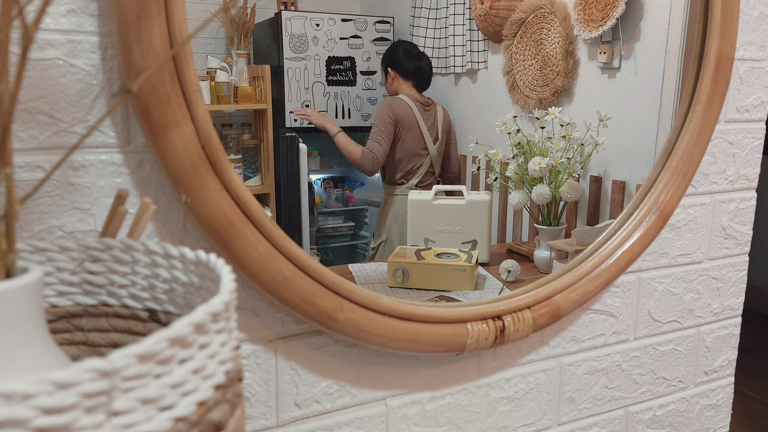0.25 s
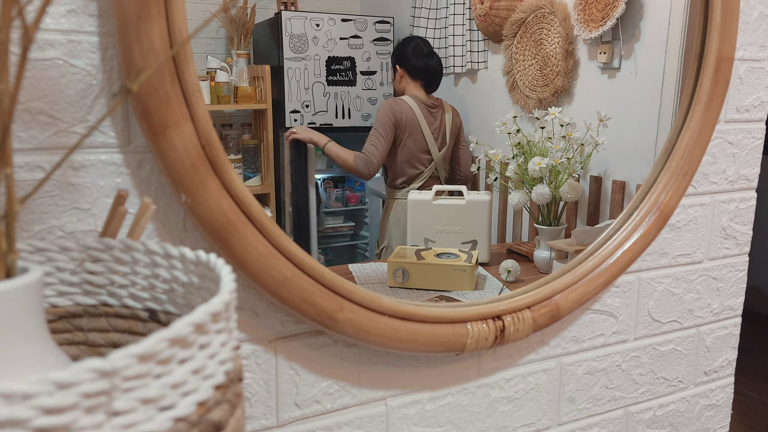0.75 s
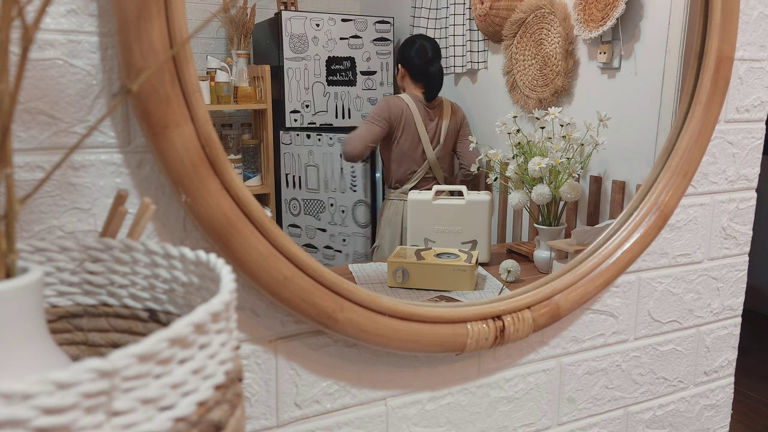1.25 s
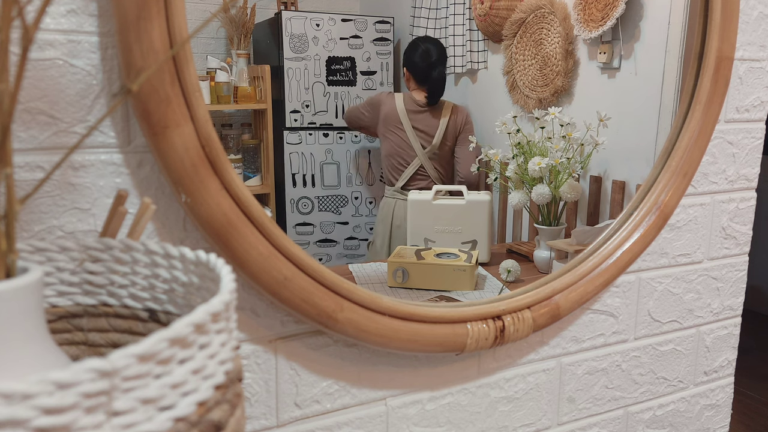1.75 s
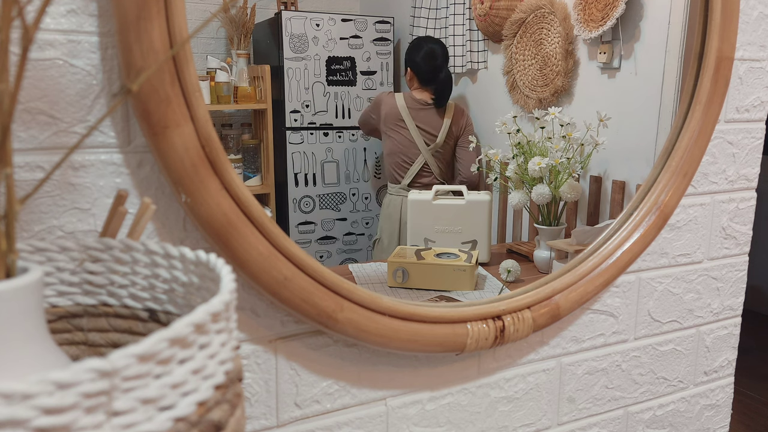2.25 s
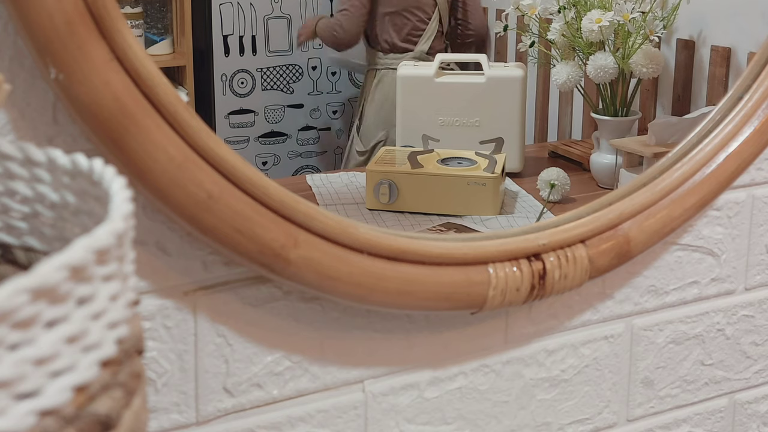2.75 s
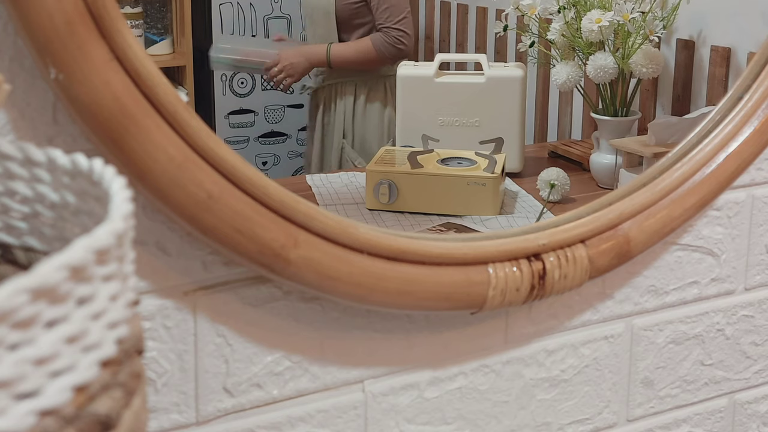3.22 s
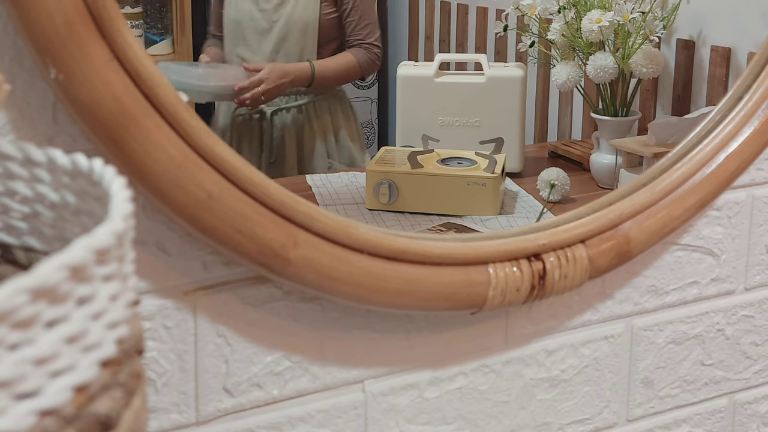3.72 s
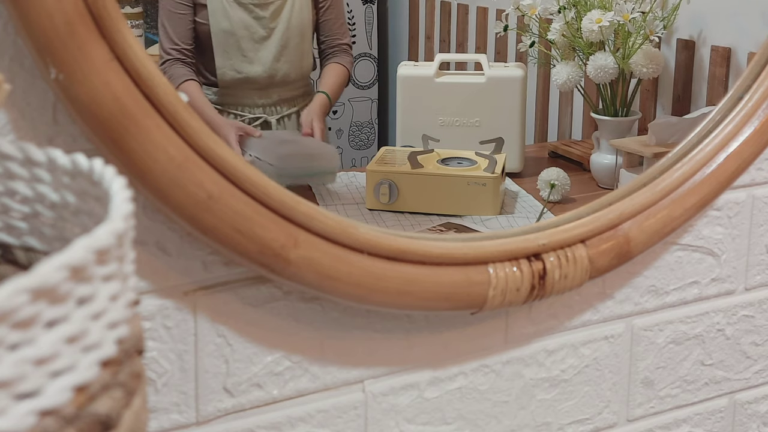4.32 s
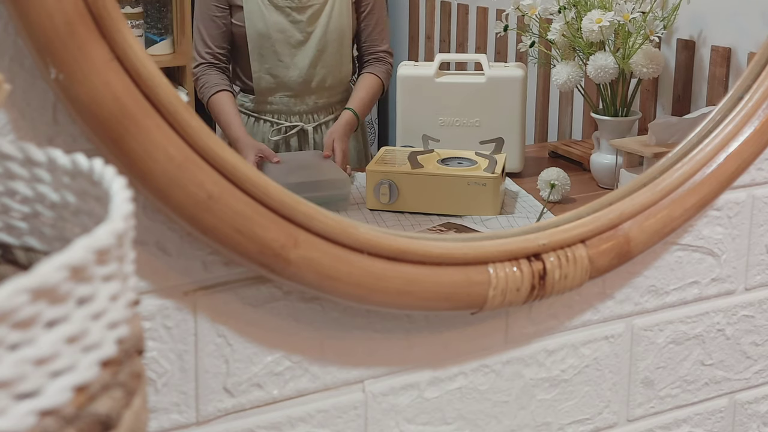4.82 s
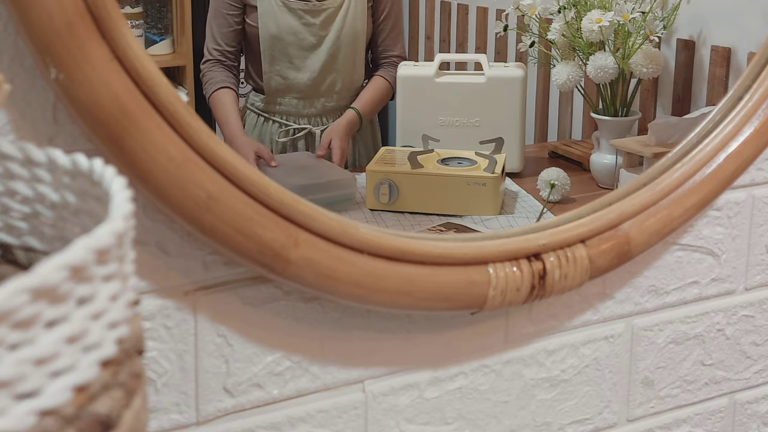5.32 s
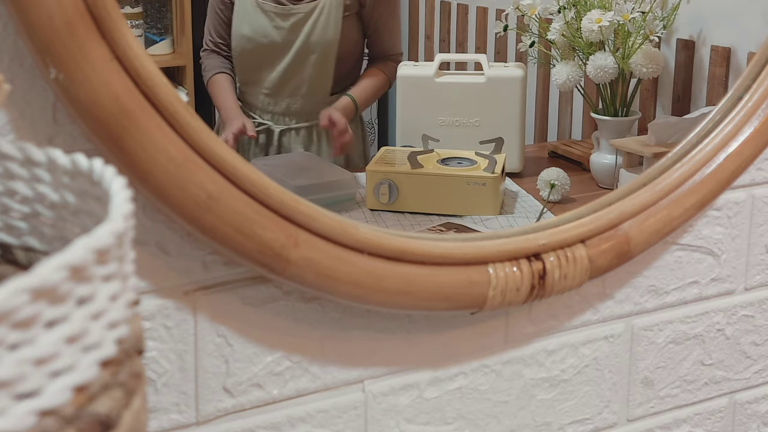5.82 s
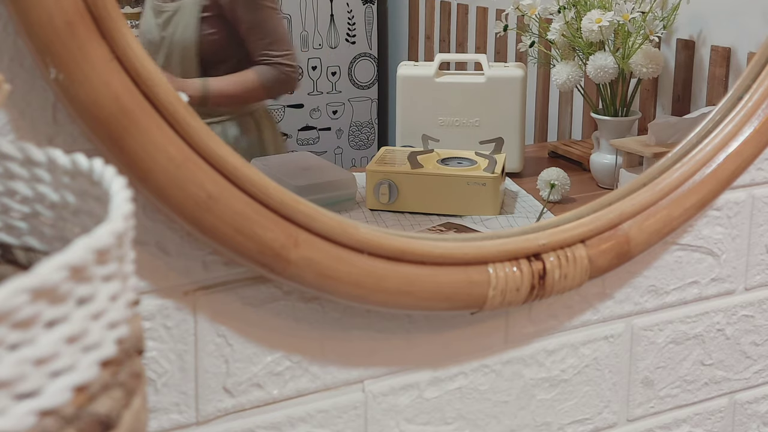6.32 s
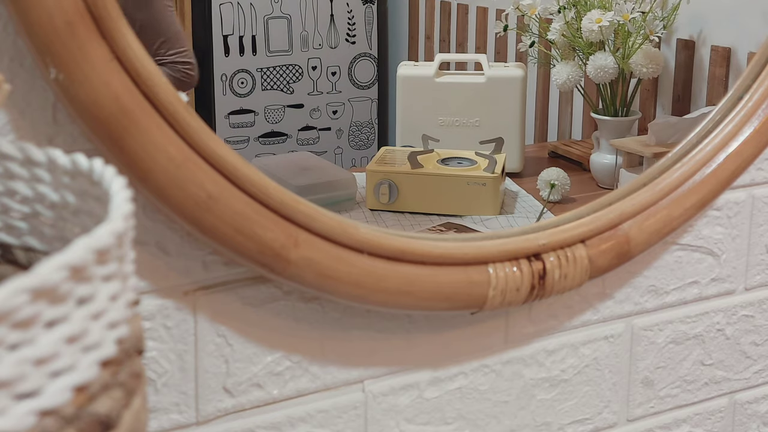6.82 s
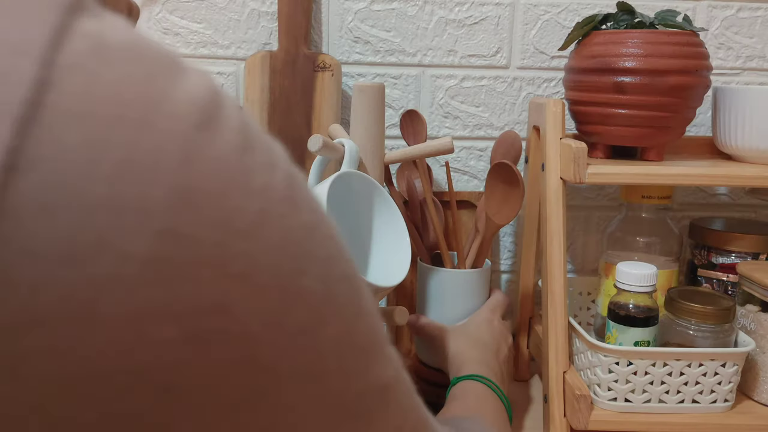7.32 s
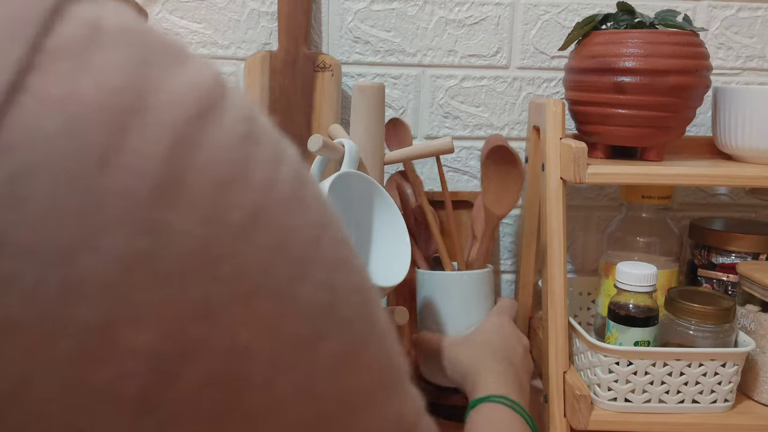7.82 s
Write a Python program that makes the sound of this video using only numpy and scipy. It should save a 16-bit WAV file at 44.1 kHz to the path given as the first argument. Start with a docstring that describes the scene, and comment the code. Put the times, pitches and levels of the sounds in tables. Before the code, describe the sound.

Over soft fridge hum and a ticking clock, a door closes heavily, a box lands and its latches snap, and a ceramic cup scrapes with spoons knocking.

```python
"""Quiet kitchen with fridge, box and spoons

A hard-walled kitchen at two microphone ports. Something slides and bumps in the fridge; its door is nudged
and thuds shut. A plastic box is set on a table, its latches snap, and a cup of spoons is dragged and clatters.
Blows are decaying modes plus a noise burst; slides are noisy slips through resonances. A wall clock steps
once a second until 6.6 s over fridge hum and air; clothes rustle. The level dips briefly at 7.1 s."""
import sys
import numpy as np
from scipy import signal
from scipy.fft import rfft, irfft
from scipy.io import wavfile
from scipy.ndimage import uniform_filter1d

SR = 44100
rng = np.random.default_rng(int(sys.argv[2]) if len(sys.argv) > 2 else 0)


def to_wav(s):
    """Save 16-bit WAV."""
    ch = np.atleast_2d(s).T  # columns
    pcm = np.round(np.clip(ch, -1, 1) * 32767)  # PCM
    wavfile.write(sys.argv[1], SR, pcm.astype(np.int16))


N = 355887
TIME = np.arange(N) / SR
DIP_S, DIP_LENGTH_S = 7.1025, 0.003   # the level dips briefly here


def from_db(db):
    """Decibels to gain."""
    return 10 ** (np.asarray(db) / 20)


def rms_one(x):
    """Scale to rms 1."""
    return x / np.sqrt(np.mean(x ** 2) + 1e-20)


def at_hz(points, hz):
    """Read a table on a log-frequency axis."""
    table_hz, value = np.array(points).T
    return np.interp(np.log(hz + 1), np.log(table_hz), value)


def level(rows):
    """Gain curve over time from (time_s, level_db) rows."""
    return from_db(np.interp(TIME, *np.transpose(rows)))


def coloured(x, spectrum):
    """Give x the spectrum; rms 1."""
    size = x.shape[-1]
    hz = np.arange(size // 2 + 1) * SR / size
    return rms_one(irfft(rfft(x) * from_db(at_hz(spectrum, hz)), size))


# How alike the two microphone ports hear diffuse sound: pitch_hz, likeness (1 = identical)
PORT_LIKENESS = [(40, 0.74), (120, 0.62), (400, 0.77), (1000, -0.13), (3000, -0.046), (15000, -0.041)]


def wide(size, source=1):
    """Noise at the two microphone ports: alike in the bass, unrelated in the treble."""
    shared, own = rfft(rng.standard_normal((2, size)) * source)
    hz = np.arange(size // 2 + 1) * SR / size
    alike = np.clip(at_hz(PORT_LIKENESS, hz), -1, 1)
    middle = np.sqrt((1 + alike) / 2) * shared
    side = np.sqrt((1 - alike) / 2) * own
    return irfft([middle + side, middle - side], size)


def resonate(x, hz, width_hz):
    """One resonance with gain 1 on top."""
    r = np.exp(-np.pi * width_hz / SR)
    top = (1 - r * r) / 2
    return signal.lfilter([top, 0, -top], [1, -2 * r * np.cos(2 * np.pi * hz / SR), r * r], x)


def narrow(x, hz, width_hz):
    """A resonance applied twice, with steep sides."""
    return resonate(resonate(x, hz, width_hz), hz, width_hz)


def body(slips, peaks):
    """Slips heard through a few resonances; rms 1."""
    return rms_one(sum(from_db(db) * narrow(slips, hz, width) for hz, width, db in peaks))


def grit(per_s, spread_db):
    """Envelope of dense slips at random moments and of uneven strength."""
    slipping = rng.random(N) < per_s / SR
    return slipping * from_db(spread_db * np.minimum(rng.exponential(1, N), 4))


def stroke(s, db, attack_s, hold_s, release_s):
    """Gain that rises 30 dB per attack_s, holds, then falls 30 dB per release_s, reaching 180 dB down on either
    side."""
    rise = (s + attack_s - TIME) / attack_s
    fall = (TIME - s - attack_s - hold_s) / release_s
    return from_db(db - 30 * np.clip(np.maximum(rise, fall), 0, 6))


# Tilt of diffuse sound across the ports: pitch_hz, left_minus_right_db
PORT_BALANCE = [(60, 9.5), (240, 1.5), (950, 1.5), (3770, 0.5), (15000, -4)]


def leaning(x):
    """Diffuse sound reaches the left port with more bass, the right with more treble."""
    lean = at_hz(PORT_BALANCE, np.arange(N // 2 + 1) * SR / N) / 2
    return irfft(rfft(x) * from_db([lean, -lean]), N)


def add(out, sound, s, pan_db):
    """Lay a sound into the stereo track; pan_db is left minus right."""
    at = round(s * SR)
    sound = sound[:N - at]
    out[:, at:at + len(sound)] += sound * from_db([[pan_db / 2], [-pan_db / 2]])


def crack(spectrum, t60, rise_s):
    """The burst of countless short modes at a contact: so many overlap that its spectrum has no gaps."""
    t = np.arange(4096) / SR
    fall = from_db(-30 * t / t60)
    noise = rfft(rng.standard_normal(len(t)) * fall)
    even = irfft(np.exp(1j * np.angle(noise)))   # keep only the phase: a flat spectrum
    burst = coloured(even, spectrum) * fall * (1 - np.exp(-t / rise_s))
    return burst * np.sqrt(np.sum(fall ** 4) / np.sum(burst ** 2))


def blows(events, modes, spectrum, crack_t60, rise_s, pan_db, order=1):
    """Each blow rings the same modes, neighbours in opposite phase; a softer contact dulls the high ones."""
    out, t = np.zeros((2, N)), np.arange(SR // 3) / SR
    hz, mode_db, t60 = np.array(modes).T[:, :, None]
    phase = (-1) ** np.arange(len(hz))[:, None]
    for s, db, contact_hz, ring_db in events:
        uneven_db = 1.5 * rng.standard_normal(hz.shape)   # no two blows strike quite alike
        strength = from_db(ring_db + mode_db + uneven_db) * phase
        ringing = strength * from_db(-60 * t / t60) * np.sin(2 * np.pi * hz * t)
        sound = ringing.sum(axis=0) * (1 - np.exp(-t / rise_s))
        sound[:4096] += crack(spectrum, crack_t60, rise_s)
        soft = signal.butter(order, min(contact_hz, SR / 2.2), fs=SR)
        add(out, from_db(db) * signal.lfilter(*soft, sound), s, pan_db)
    return out


# Colour of a thing sliding on a fridge shelf: pitch_hz, density_db (relative)
SHELF_SLIDE_COLOUR = [(900, -13.5), (1850, -12), (2250, -2), (2850, -11.5), (4000, -5.5), (5600, -13.5),
                      (9100, -20), (13400, -12.5), (15800, -20)]


def fridge_slide():
    """Slips under a thing on a fridge shelf, already under way at the start."""
    gain = stroke(-.01, db=-48.5, attack_s=0.0095, hold_s=0.13, release_s=0.26)
    return gain * coloured(wide(N, grit(9000, 0.5)), SHELF_SLIDE_COLOUR)


# Steady air of the room (fridge motor and fan, far street, microphone hiss): pitch_hz, density_db (relative)
ROOM_AIR = [(12, -63), (20, -38), (55, 2), (110, 3), (168, -6.5), (248, -6), (399, -4), (472, -13.5),
            (513, -32), (718, -56), (1330, -36.5), (16000, -39)]


def air():
    """Broad steady noise of the room and the microphone."""
    return from_db(-53.5) * coloured(wide(N), ROOM_AIR)


# Fridge motor tones: pitch_hz, width_hz, level_db (rms, before the tilt across the ports)
FRIDGE_HUM = [(124.6, 27, -65), (246, 12.4, -57), (325.7, 19, -63), (516.6, 11, -68)]


def fridge_hum():
    """Wavering motor tones: noise through narrow resonances."""
    white = wide(N)
    return sum(from_db(db) * rms_one(narrow(white, hz, width)) for hz, width, db in FRIDGE_HUM)


# Faint rushing in the middle range, over time: time_s, level_db
RUSHING_LEVEL = [(0., -66), (1.75, -61), (2.1, -45.5), (2.7, -63), (7.09, -59), (7.12, -62.5),
                 (8.07, -53.5)]
# Its colour: pitch_hz, density_db (relative)
RUSHING_COLOUR = [(300, -3), (500, 5), (1000, -6), (1500, -12.5), (3000, -24.5), (6000, -59)]


def rushing():
    """Middle-range noise whose level rises and falls."""
    return level(RUSHING_LEVEL) * coloured(wide(N), RUSHING_COLOUR)


# Two runs of clock steps one second apart: start_s, count
CLOCK_RUNS = [(.527, 3), (3.533, 4)]
# Sound of the clock case at each contact: pitch_hz, density_db (relative)
CASE_CRACK = [(600, -29), (900, -2), (1400, -3), (2100, -0.5), (2800, -14.5), (3500, -4.5), (6200, -11),
              (7200, -17), (13000, -24)]
# A small ringing part, loudest on the first contacts: pitch_hz, level_db, t60_s, loss_db_per_s
CLOCK_PART = (6200, 3.6, 0.013, 300)


def clock():
    """Each step of the seconds hand is the same run of six gear contacts that swells to a peak and fades."""
    gap_s, peak_s, peak_db = 0.018, 0.06, -46
    swell_db_per_s, fade_db_per_s = 341, 246
    out, t = np.zeros((2, N)), np.arange(4096) / SR
    hz, ring_db, t60, loss = CLOCK_PART
    ring = from_db(ring_db - 60 * t / t60) * np.sin(2 * np.pi * hz * t)
    for s in [first + k for first, count in CLOCK_RUNS for k in range(count)]:
        for after in gap_s * np.arange(6):
            db = peak_db - max(swell_db_per_s * (peak_s - after), fade_db_per_s * (after - peak_s))
            contact = crack(CASE_CRACK, 0.041, 0.00076) + from_db(-loss * after) * ring
            add(out, from_db(db) * contact, s + after, 1.5)
    return out


# Dull bumps of hands and things: start_s, level_db, pitch_hz, scuff_db (relative)
DULL_BUMPS = [(0.732, -17, 299, -16), (.774, -20.5, 282, -21), (1.797, -28.5, 478, -15.5),
              (1.881, -40, 251, 5), (1.986, -29.5, 424, -7.5), (2.094, -34.5, 308, -9.5),
              (2.136, -22, 383, -21.5), (3.515, -36, 393, -35), (4.032, -28.5, 448, -22),
              (4.602, -25, 388, -33), (4.878, -25, 116, -45), (5.643, -35.5, 305, -4.5)]
# Colour of the scuff, also of the door rattle: pitch_hz, density_db (relative)
SCUFF_COLOUR = [(400, -10), (1200, -14), (2500, -19), (6000, -34), (15000, -44.5)]


def bumps():
    """A soft push rings a close pair of panel modes, with a scuff on top."""
    out, t = np.zeros((2, N)), np.arange(4096) / SR
    for s, db, hz, scuff_db in DULL_BUMPS:
        pair = np.sin(2 * np.pi * hz * t) + 0.24 * np.sin(2 * np.pi * 1.36 * hz * t)
        thud = pair * from_db(-60 * t * hz / 14)   # falls 60 dB in 14 cycles
        thud = thud * (1 - np.exp(-t / 0.0013))
        scuff = from_db(scuff_db - 7.5) * crack(SCUFF_COLOUR, 0.057, 0.034)
        add(out, from_db(db) * (thud + scuff), s, 0.5)
    return out


# Things rattle in the swinging door: start_s, level_db, attack_s, hold_s
DOOR_RATTLE = (1.73, -60.5, 0.3865, 0.28)


def door_rattle():
    """Sparse, very uneven knocks of things in the swinging door."""
    s, db, attack, hold = DOOR_RATTLE
    return stroke(s, db, attack, hold, attack) * coloured(wide(N, grit(380, 7.5)), SCUFF_COLOUR)


# The fridge cabinet rocks when nudged and after the thud: start_s, level_db, hold_s
CABINET_ROCKS = [(1.976, -39.5, 0.067), (2.111, -34, .01), (2.385, -38, 0.061)]


def rocking():
    """The cabinet sways on its lowest mode with a loose rattle an octave up."""
    sway = sum(stroke(s, db, 0.036, hold, 0.19) for s, db, hold in CABINET_ROCKS)
    tone = np.sin(2 * np.pi * 72.3 * TIME)
    loose = rms_one(narrow(wide(N), 145, 47))
    return sway * np.sqrt(2) * (tone + 0.3 * loose)


# Fridge door on its seal: start_s, level_db, contact_hz, ringing_db (relative)
DOOR_BLOWS = [(2.218, -23, 5930, -27), (2.229, -8.5, 2540, 4.5)]
# Ringing of door and cabinet: pitch_hz, level_db (relative), t60_s
FRIDGE_MODES = [(41.4, -10.5, 0.64), (67.7, -0.5, 0.3), (126.9, -15, 0.62), (400, -5.5, 0.058),
                (510, -8.5, 0.047)]
# Burst at the seal: pitch_hz, density_db (relative)
SEAL_CRACK = [(180, 1), (400, -8), (1000, -8.5), (1600, -17), (2200, -12), (3000, -22), (15500, -23)]


def fridge_door():
    """The door meets its seal and rings low, long modes with a slow-rising burst."""
    return blows(DOOR_BLOWS, FRIDGE_MODES, SEAL_CRACK, crack_t60=0.039, rise_s=0.01, pan_db=1.0)


# A faint thin tone: pitch_hz, width_hz, level_db (rms before gating and tilt), start_s
THIN_TONE = (1343, 28, -75, 3.5)


def thin_tone():
    """Noise through one narrow resonance, heard until the brief dip."""
    hz, width, db, start = THIN_TONE
    return from_db(db) * rms_one(narrow(wide(N), hz, width)) * (TIME > start) * (TIME < DIP_S)


# Clothes and fingers: centre_s, level_db, length_s
RUSTLES = [(3.801, -60, 0.029), (4.336, -60.5, 0.066), (5.277, -63.5, 0.079), (6.446, -63.5, 0.073),
           (7.434, -67, 0.084)]
# Colour of cloth: pitch_hz, density_db (relative)
CLOTH_COLOUR = [(1800, -10), (4000, -9.5), (12300, -7.5), (15800, -7.5)]


def rustle():
    """Dense slips of cloth under smooth bell-shaped strokes."""
    strokes = sum(from_db(db) * np.exp(-((TIME - s) / length) ** 2) for s, db, length in RUSTLES)
    return strokes * coloured(wide(N, grit(6000, 1.04)), CLOTH_COLOUR)


# Box meets table: start_s, level_db, contact_hz, ringing_db (relative)
BOX_LANDINGS = [(4.281, -39, 900, 5.5), (4.313, -39, 800, -6), (4.331, -16, 4460, -0.5),
                (4.372, -31, 1000, -8), (4.40, -40.5, 800, 1)]
# Ringing of the table: pitch_hz, level_db (relative), t60_s
TABLE_RINGING = [(432, 3.5, 0.045), (541, 9, 0.036), (620, -2.5, 0.02), (675, -7, 0.032)]
# Burst at the table: pitch_hz, density_db (relative)
LANDING_CRACK = [(300, -9.5), (560, 0), (950, -11.5), (1900, -12.5), (2600, -18.5), (3500, -31),
                 (15500, -48)]


def box_on_table():
    """The box lands in small contacts that ring the short modes of the table."""
    return blows(BOX_LANDINGS, TABLE_RINGING, LANDING_CRACK, crack_t60=0.029, rise_s=0.0012, pan_db=2.5)


# Latches snap, and the lid drops back a moment later: start_s, level_db, contact_hz, ringing_db (relative)
LATCH_SNAPS = [(4.745, -22, 5850, 9), (4.760, -23, 800, 8), (4.870, -21, 6900, 2), (4.877, -26, 800, 15),
               (5.352, -7.5, 6860, -4.5), (5.364, -22.5, 900, 9.5)]
# Ringing of the plastic box: pitch_hz, level_db (relative), t60_s
BOX_RINGING = [(313, -10.5, 0.042), (426, -12.5, 0.024), (555, -2, 0.024), (693, 1, 0.012),
               (956, -9.5, 0.014), (1984, 3.5, 0.0094)]
# Burst at the latch: pitch_hz, density_db (relative)
LATCH_CRACK = [(150, -14), (300, 1.5), (650, -2), (1150, -3.5), (2050, -4), (3200, -20.5), (5000, -35.5),
               (15500, -47.5)]


def latches():
    """Snapping latches and the lid ring the short modes of the plastic box."""
    return blows(LATCH_SNAPS, BOX_RINGING, LATCH_CRACK, crack_t60=0.025, rise_s=0.0014, pan_db=-3.0)


# The cup is dragged over the shelf in three pulls: start_s, hold_s, scrape_db, squeal_db, squeal_hz
CUP_PULLS = [(7.541, 0.042, -48, -51, 4230), (7.619, 0.057, -51, -47.5, 3980),
             (7.721, 0.025, -47.5, -47, 3720)]
# The shelf is jolted as the cup sticks and frees: start_s, level_db, hold_s
SHELF_JOLTS = [(7.569, -44.5, .012), (7.736, -42.5, .06), (8.014, -47.5, .03)]
# Resonances of the scraped cup: pitch_hz, width_hz, level_db (relative)
CUP_BODY = [(1960, 1000, 19.5), (5240, 2500, 6), (11200, 6100, 1)]
# Resonances of the shelf under it: pitch_hz, width_hz, level_db (relative)
SHELF_BODY = [(141, 52, 4), (286, 180, 8.5), (463, 190, -1)]


def cup_drag():
    """The same slips excite the cup, its squealing foot and the shelf it slides on."""
    attack_s, release_s = 0.075, 0.079
    slips = wide(N, grit(6000, 0.96))
    scrape, squeal = 0, 0
    for s, hold, scrape_db, squeal_db, squeal_hz in CUP_PULLS:
        scrape = scrape + stroke(s, scrape_db, attack_s, hold, release_s)
        foot = rms_one(narrow(slips, squeal_hz, width_hz=980))
        squeal = squeal + stroke(s, squeal_db, attack_s, hold, release_s) * foot
    carried = from_db(-55.5) * (TIME > SPOON_BLOWS[0][0])   # spoons shifting in the carried cup
    scrape = np.maximum(scrape, carried)
    jolts = sum(stroke(s, db, 0.034, hold, 0.14) for s, db, hold in SHELF_JOLTS)
    rumble = (from_db(5) * scrape + jolts) * body(slips, SHELF_BODY)
    return scrape * body(slips, CUP_BODY) + squeal + rumble


# Spoons against the cup: start_s, level_db, contact_hz, ringing_db (relative)
SPOON_BLOWS = [(7.614, -41, 13000, -22), (7.772, -37.5, 2000, -5), (7.848, -39, 2300, 0),
               (7.878, -56, 1000, 4), (7.901, -41, 11400, 1), (7.916, -44.5, 8050, 4.5),
               (7.964, -47, 1000, 14.5), (8.031, -26.5, 5440, 4)]
# Ringing of the ceramic cup: pitch_hz, level_db (relative), t60_s
CUP_RINGING = [(759, -0.5, 0.055), (1640, -11, 0.023), (2025, -7, 0.051), (2540, -11.5, 0.06),
               (4810, 1, 0.0098), (6660, -11, 0.023), (8800, -23, 0.025), (11550, -15, 0.044)]
# Burst of spoon on cup: pitch_hz, density_db (relative)
SPOON_CRACK = [(300, -33), (900, -4.5), (2100, 7), (3000, 0), (5000, -1), (8000, -7), (15500, -7.5)]


def spoons():
    """Wooden spoons knock the cup and ring its modes under a bright burst."""
    return blows(SPOON_BLOWS, CUP_RINGING, SPOON_CRACK,
                 crack_t60=0.039, rise_s=0.00083, pan_db=-3.5, order=2)


# Dying away of the kitchen: pitch_hz, t60_s
KITCHEN_T60 = [(150, 0.3), (1000, 0.28), (4000, 0.31), (12000, 0.24)]
# The tail is weaker in one band: pitch_hz, width_octaves, level_db
TAIL_DIP = (1910, 0.23, -4)


def sum_and_difference(pair):
    """Turn left and right into sum and difference, or back at twice the size."""
    return np.array([pair[0] + pair[1], pair[0] - pair[1]])


def room(x):
    """Kitchen tail: noise that builds in a few ms, is strong early and dies band by band, without deep bass."""
    size = SR * 3 // 4
    t, hz = np.arange(size) / SR, np.arange(size // 2 + 1) * SR / size
    white, tail = rfft(wide(size)), 0
    for octave in np.arange(7.5, 14.6, .5):   # log2 of the band centre in Hz
        share = np.clip(1 - 2 * np.abs(np.log2(hz + 1) - octave), 0, 1)
        fall = from_db(-60 * t / at_hz(KITCHEN_T60, 2 ** octave))
        tail = tail + irfft(white * share, size) * fall
    tail = tail * (1 - np.exp(-t / 0.0028)) * (1 + np.exp(-t / 0.0071))
    tail = sum_and_difference(tail)
    # many overlapping room modes: no broad band stands out
    power = np.abs(rfft(tail)) ** 2 + 1e-9
    even = np.sqrt(uniform_filter1d(power, size=600) / uniform_filter1d(power, size=25))
    dip_hz, width, dip_db = TAIL_DIP
    even = even * from_db(dip_db * np.exp(-(np.log2((hz + 1) / dip_hz) / width) ** 2))
    tail = irfft(rfft(tail) * even * (hz > 140))[:, :size * 9 // 10]   # too small for deep bass
    tail = sum_and_difference(tail)
    tail = tail / np.sqrt(np.sum(tail ** 2) / 2)
    return signal.fftconvolve(x.mean(axis=0)[None], tail, axes=1)[:, :N]


def scene():
    """Contacts reach the microphone direct and through the room; diffuse sound leans across the ports."""
    landing, cup = box_on_table(), spoons()
    box = landing + latches()
    others = clock() + bumps() + fridge_door()
    box_at_ports = np.array([np.roll(box[0], 17), box[1]])   # left port hears the box 17 samples later
    direct = from_db(-5.5) * (others + box_at_ports) + cup
    reverberant = room(from_db(2.5) * (others + box - 0.28 * landing) + cup)
    rubbing = fridge_slide() + door_rattle() + rustle() + cup_drag()
    background = air() + fridge_hum() + rushing() + thin_tone()
    return direct + reverberant + rocking() + leaning(rubbing + background)


def record(dry):
    """The level dips briefly, then the top above 15850 Hz is cut."""
    dip = 1 - np.exp(-((TIME - DIP_S) / DIP_LENGTH_S) ** 4)
    low_pass = signal.ellip(10, .5, 60, 15850, fs=SR, output="sos")
    return signal.sosfilt(low_pass, dry * dip)


dry = scene()
out = record(dry)
to_wav(out)
```